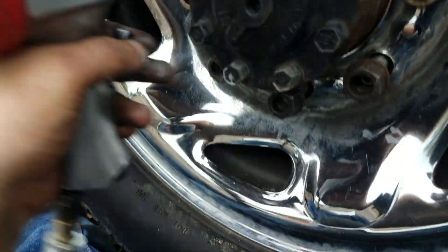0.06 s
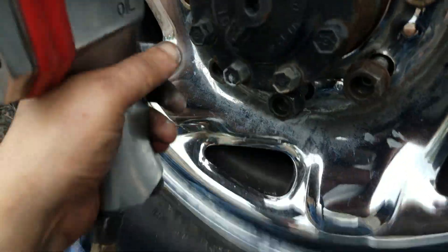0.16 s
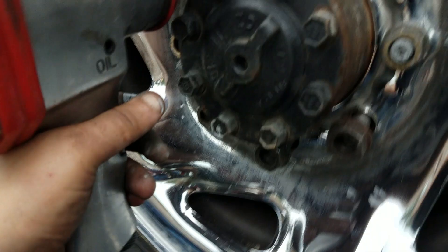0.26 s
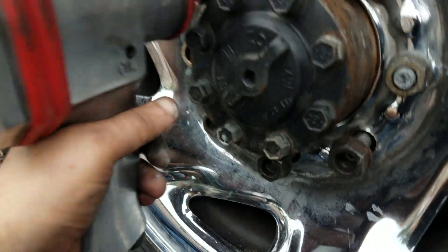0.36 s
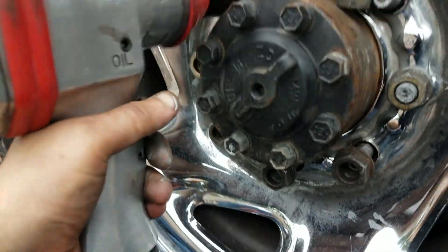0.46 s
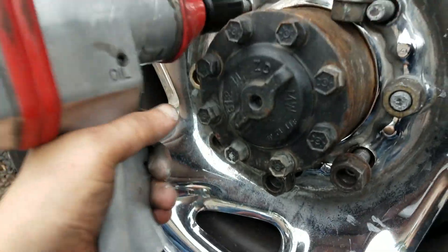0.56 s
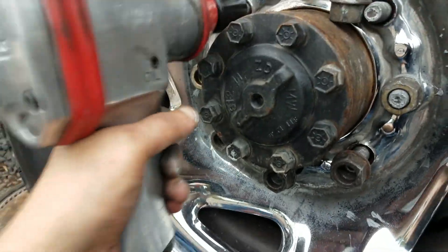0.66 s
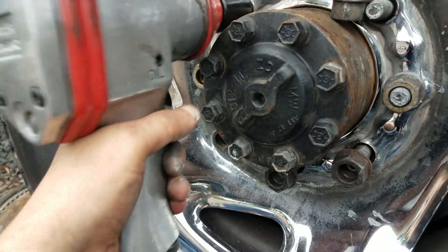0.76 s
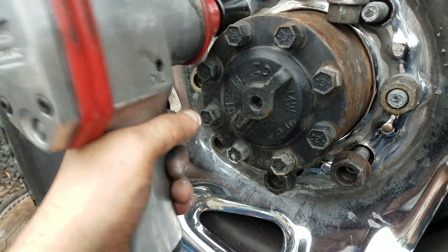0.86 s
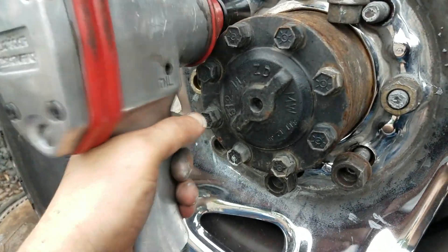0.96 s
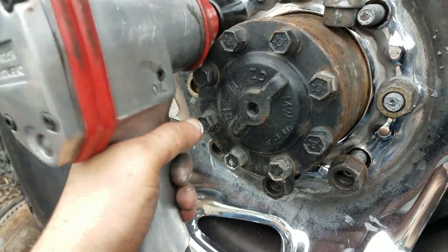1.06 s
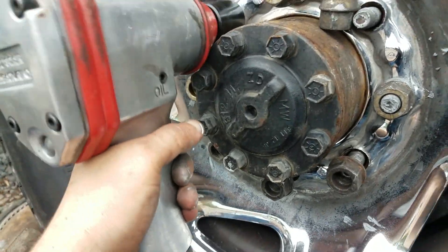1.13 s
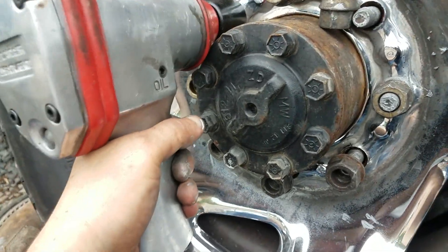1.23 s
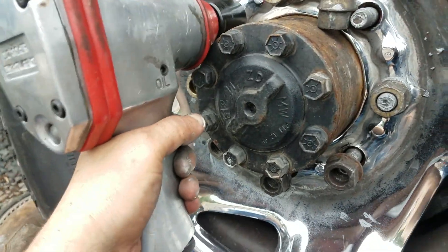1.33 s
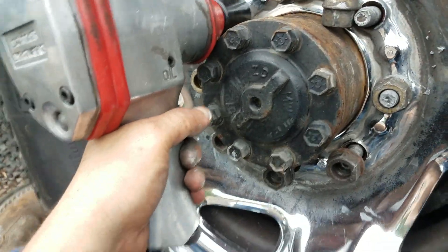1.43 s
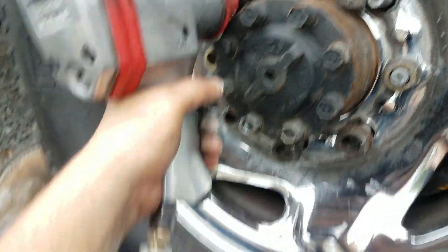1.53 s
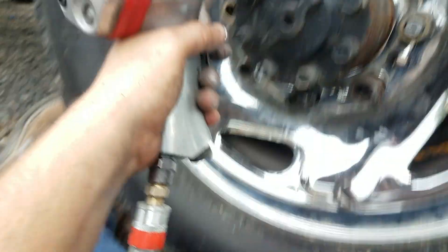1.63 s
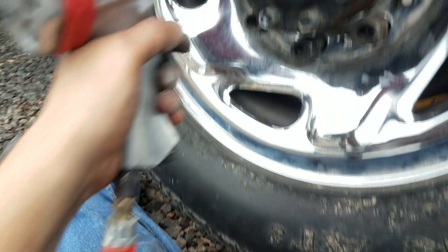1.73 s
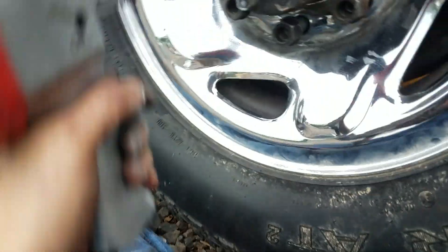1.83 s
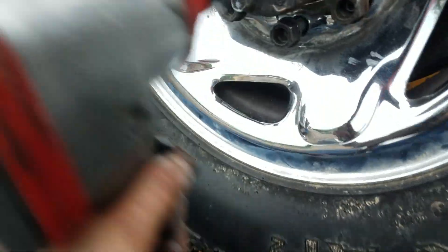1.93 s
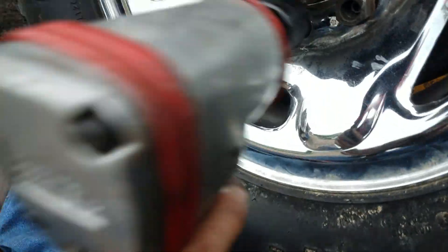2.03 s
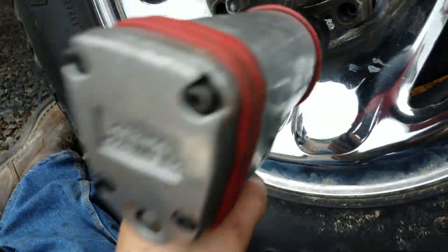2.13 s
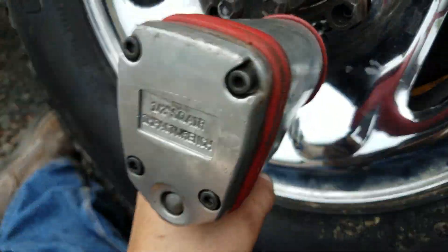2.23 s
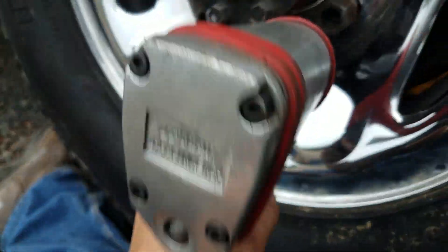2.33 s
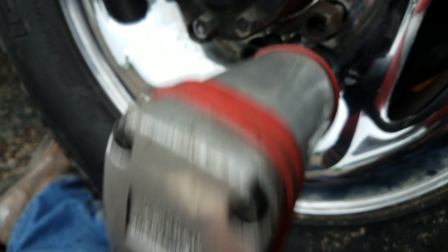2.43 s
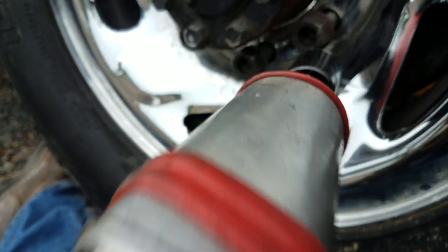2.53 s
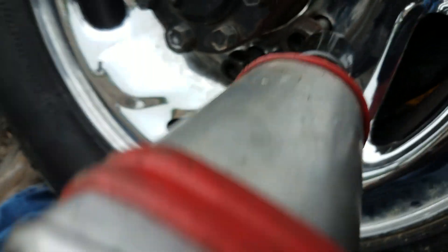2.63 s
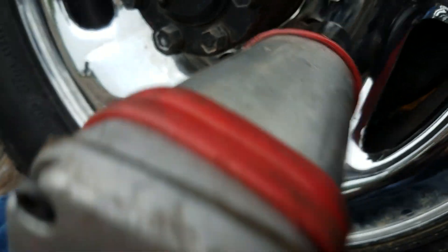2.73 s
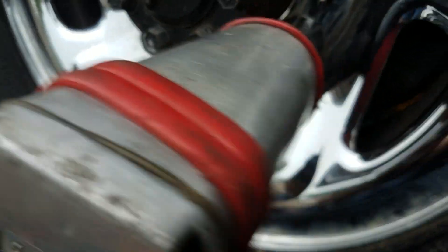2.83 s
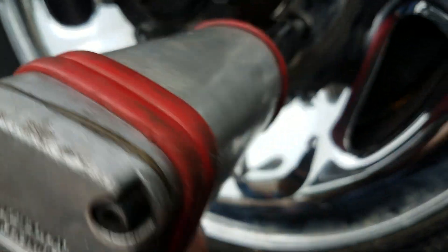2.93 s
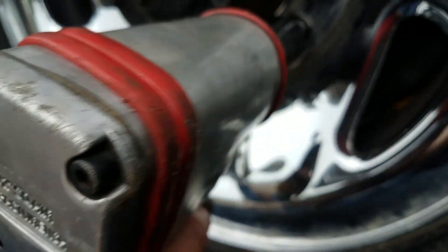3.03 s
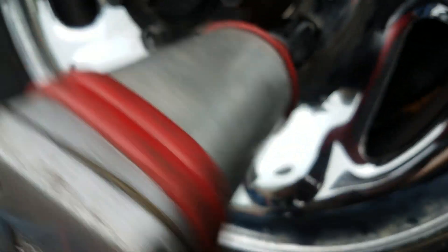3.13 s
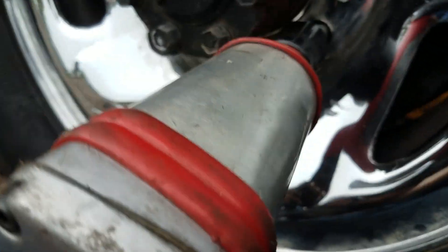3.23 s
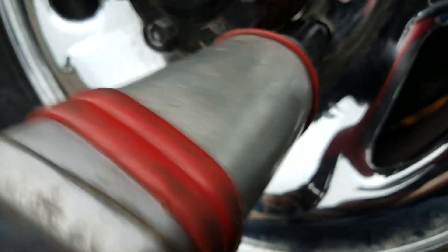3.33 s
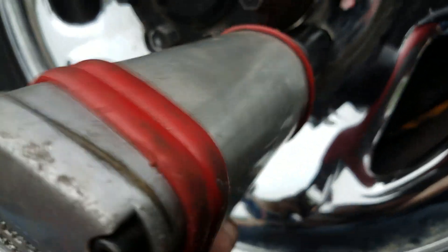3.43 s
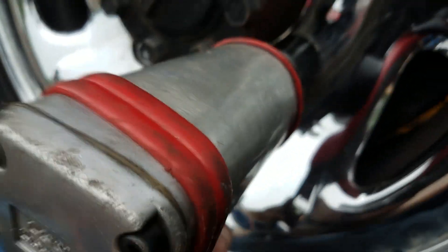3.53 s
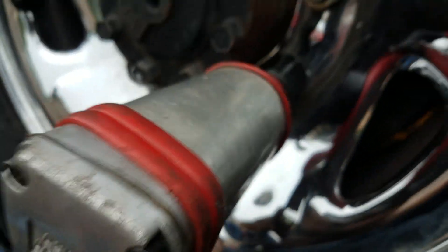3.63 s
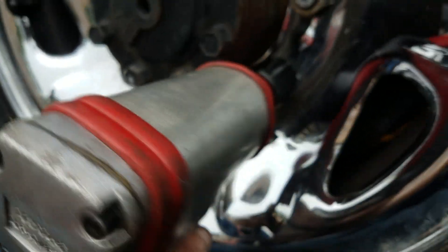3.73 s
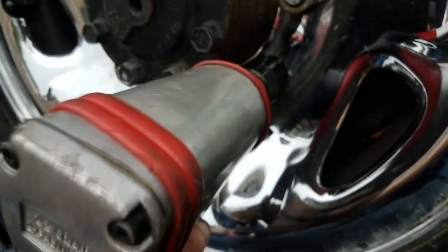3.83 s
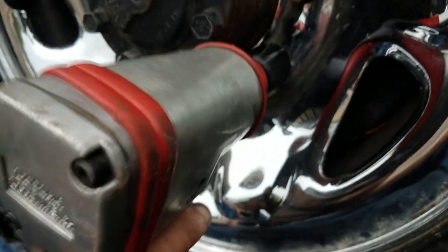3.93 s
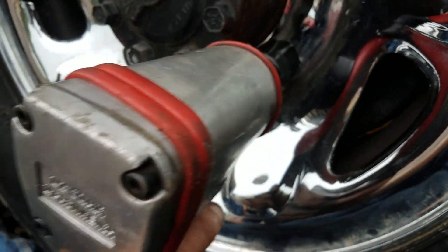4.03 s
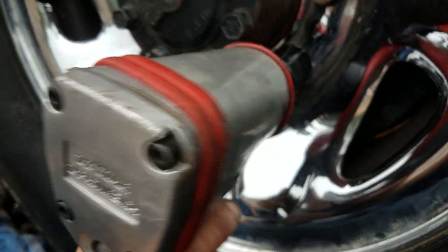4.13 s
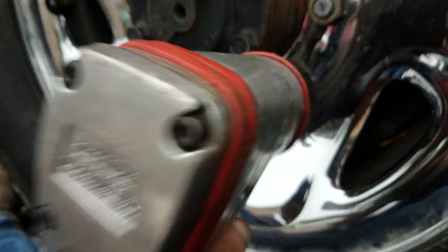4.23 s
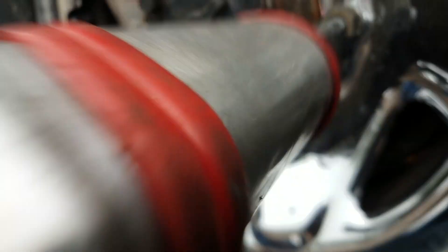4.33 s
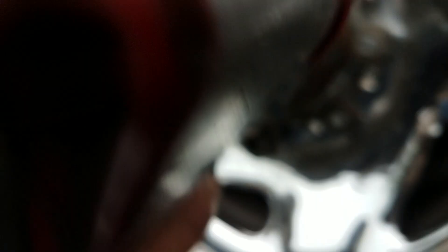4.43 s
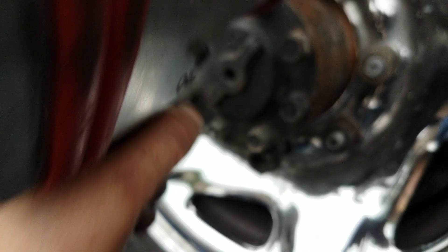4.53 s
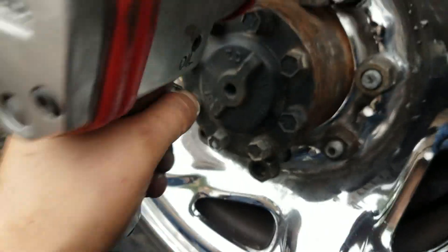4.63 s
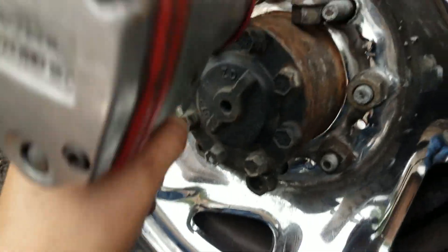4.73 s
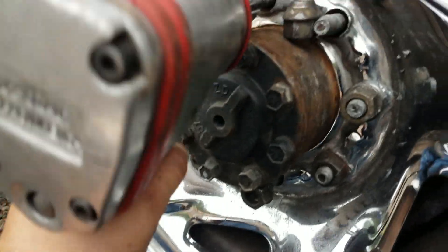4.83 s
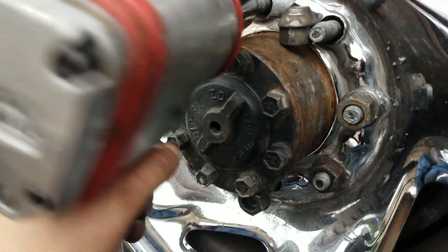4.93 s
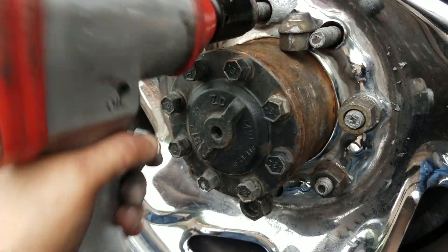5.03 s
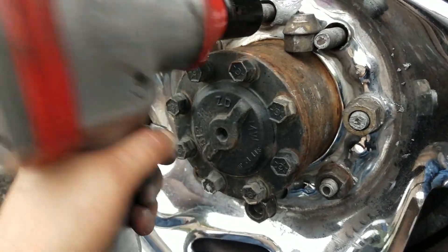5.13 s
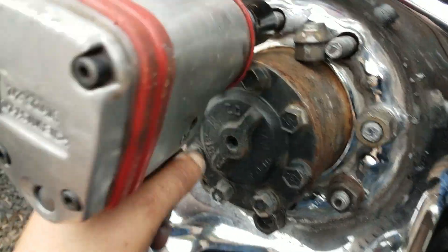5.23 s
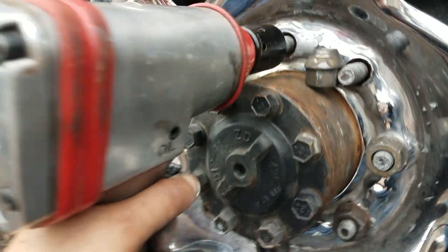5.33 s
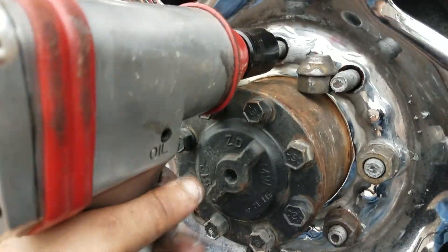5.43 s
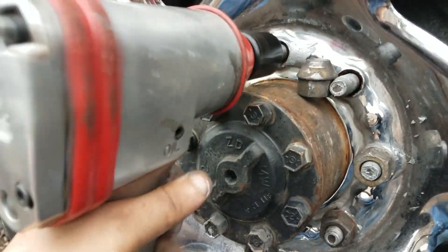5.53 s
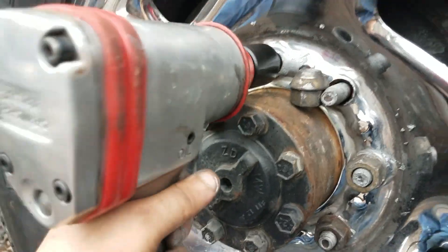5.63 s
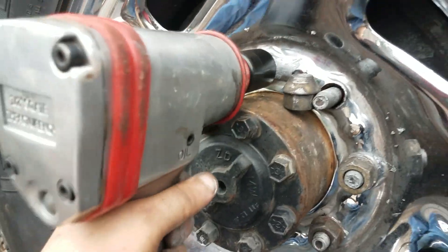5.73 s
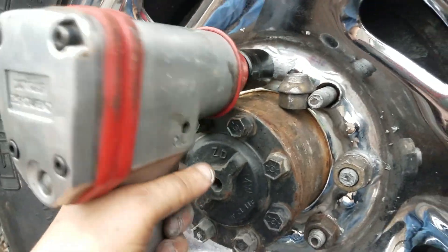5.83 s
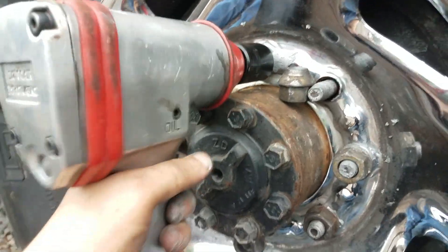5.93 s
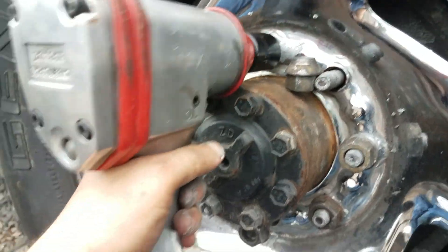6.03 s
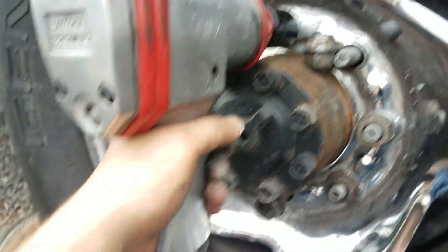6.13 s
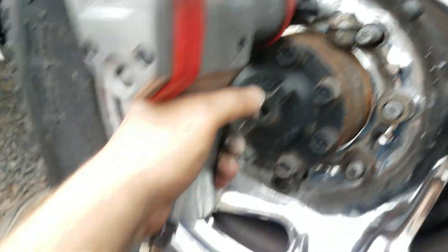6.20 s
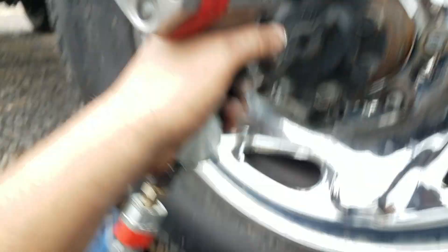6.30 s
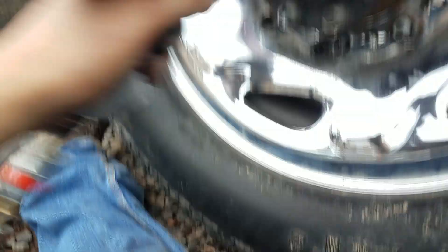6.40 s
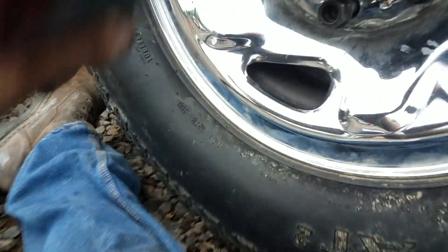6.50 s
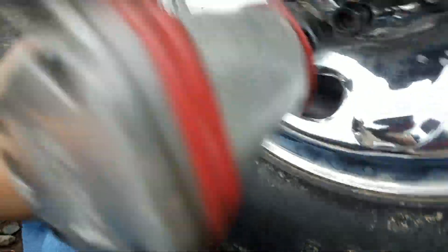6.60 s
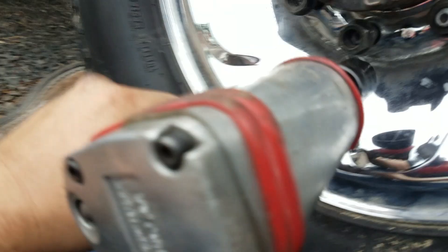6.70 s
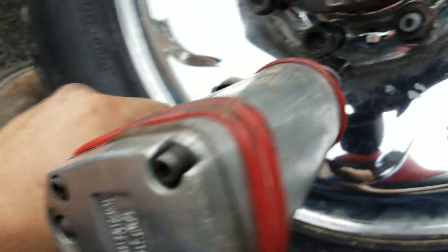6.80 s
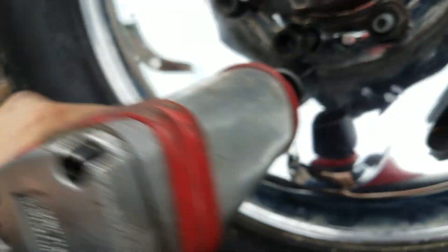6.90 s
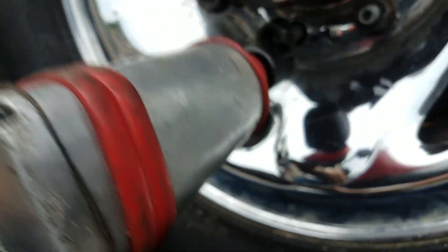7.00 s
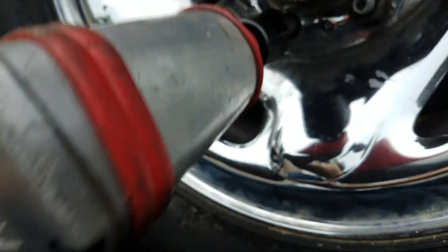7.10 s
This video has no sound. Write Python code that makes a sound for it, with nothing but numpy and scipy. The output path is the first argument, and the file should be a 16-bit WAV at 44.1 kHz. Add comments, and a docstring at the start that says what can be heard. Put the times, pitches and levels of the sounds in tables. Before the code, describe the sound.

Three bursts from an air impact wrench, recorded close on a small stereo microphone in a yard: throbbing air, a motor whine winding up, hard rapid blows ringing in steel, slightly clipped and stronger to the right in the treble. Between them are handling rumble, socket knocks, rattles and high metallic pings; a distant drone swells at the end.

```python
"""A truck wheel heard close up on a small stereo microphone: the socket clacks on nuts and studs over a yard's hum.
A pneumatic impact wrench then makes the first of three bursts: its vane motor pulses the exhaust air and
winds up in pitch, while hammer blows are short noise cracks over ringing steel. After each burst come
bouncing clacks and thin rings, with one dry snap before the third. At the end a distant drone and hiss,
made of coloured noise, swell in behind the last clacks."""
import sys
import numpy as np
from scipy import signal
from scipy.fft import rfft, irfft, next_fast_len
from scipy.io import wavfile
from scipy.ndimage import uniform_filter1d, map_coordinates

SR = 44100
rng = np.random.default_rng(int(sys.argv[2]) if len(sys.argv) > 2 else 0)


def generate_wav(signal):
    """Clip the signal to [-1, 1] and save it as 16-bit WAV at the path in sys.argv[1]."""
    frames = np.transpose(np.atleast_2d(signal))
    scaled = np.clip(frames, -1, 1) * 32767
    pcm = np.round(scaled).astype(np.int16)
    wavfile.write(sys.argv[1], SR, pcm)


N = 315756  # samples

# noise colour of struck steel: f/Hz, relative density/dB per Hz
STEEL_COLOUR = [(50, -27.5), (150, -7.5), (2100, -6), (6800, -19), (15000, -18.5)]
# modes of anvil, socket and nut: nominal f/Hz, relative level/dB, t60/s
ANVIL_MODES = [(698, -1.5, 0.032), (1520, -1.5, 0.0068), (2002, 1, 0.028), (2715, 1, 0.034),
               (3530, -7, 0.046), (8110, -11, 0.047)]
# modes of the tool housing: nominal f/Hz, relative level/dB, t60/s
HOUSING_MODES = [(203, 0.5, 0.047), (310, 2.5, 0.022), (704, 8, 0.0089)]


def amp(db):
    """Decibels to gain."""
    return 10 ** (np.asarray(db) / 20)


def unit(x):
    """Scaled to rms 1."""
    return x / np.sqrt(np.mean(x ** 2) + 1e-20)


def along(points, hz):
    """(Hz, value) points read on a log frequency axis."""
    f, v = np.transpose(points)
    return np.interp(np.log(hz + 1), np.log(f + 1), v)


def wobble(rate):
    """A smooth random curve, rate knots a second."""
    coarse = np.arange(0, N, 20)
    knots = rng.standard_normal(int(N * rate / SR) + 4)
    return np.interp(np.arange(N), coarse, map_coordinates(knots, [coarse * rate / SR]))


def filtered(x, response):
    """x times a response of frequency."""
    m = next_fast_len(N + SR // 2)
    return irfft(rfft(x, m) * response(np.fft.rfftfreq(m, 1 / SR)), m)[..., :N]


def rush(spectrum):
    """Coloured stereo noise of rms 1, its left-right likeness depending on frequency."""
    # likeness of the two channels: f/Hz, correlation
    likeness = [(30, .1), (400, .8), (1200, .3)]

    def mid_side_gains(hz):
        angle = np.arccos(np.clip(along(likeness, hz), -1, 1)) / 2
        return amp(along(spectrum, hz)) * [np.cos(angle), np.sin(angle)]

    mid, side = filtered(rng.standard_normal((2, N)), mid_side_gains)
    return unit(np.array([mid + side, mid - side]))


def patchy(x, depth_db):
    """x at rms 1, with patches of random gain over time and frequency."""
    z = signal.stft(x, nperseg=512)[2]
    field = rng.standard_normal(z.shape[1:])
    field = uniform_filter1d(uniform_filter1d(field, size=6, axis=0), size=6, axis=1)
    return unit(signal.istft(z * amp(depth_db * unit(field)), nperseg=512)[1][:, :N])


def moving_band(centre_hz, width):
    """Noise of steady level in a band whose centre glides; width as a share of the centre."""
    hz, t, z = signal.stft(rng.standard_normal((2, N)), SR, nperseg=512)
    centre, share = [np.interp(t, np.arange(N) / SR, c) for c in (centre_hz, width)]
    band = 1 / (1 + ((hz[:, None] / centre - 1) / share) ** 2)
    return unit(signal.istft(z * band / np.linalg.norm(band, axis=0), SR, nperseg=512)[1][:, :N])


def dying(hits, rise):
    """Envelope of (s, dB, s to -60 dB) hits: a short rise, then a fall lasting 5 to 500 ms."""
    env = np.zeros(N + SR)
    for s, db, t60 in hits:
        t = np.arange(round(np.clip(t60, .005, .5) * SR)) / SR
        env[round(s * SR):][:len(t)] += amp(db - 60 * t / t[-1]) * (1 - np.exp(-t / rise))
    return env[:N]


def ringing(hits, modes, scatter_db, detune=0, spread=1):
    """(s, dB) hits ring decaying modes, with random strengths, pitches and phases (spread in radians)."""
    out = np.zeros((2, N + SR))
    for s, db in hits:
        for (hz, level, t60), (size, pitch, *phase) in zip(modes, rng.standard_normal((len(modes), 4))):
            t = np.arange(round(min(t60, 1) * SR)) / SR
            phases = spread * np.array(phase)[:, None]  # one per channel
            swing = np.sin(2 * np.pi * hz * (1 + detune * pitch) * t + phases)
            decay = amp(db + level + scatter_db * size - 60 * t / t60)
            out[:, round(s * SR):][:, :len(t)] += decay * (1 - np.exp(-2 * hz * t)) * swing
    return out[:, :N]


def spans(rows):
    """For each sample the latest (start s, end s, ..) row: time since start, past end, length, other columns."""
    t, rows = np.arange(N) / SR, np.asarray(rows)
    start, end, *cols = rows[np.clip(np.searchsorted(rows[:, 0], t) - 1, 0, None)].T
    return np.clip(t - start, 0, None), np.clip(t - end, 0, None), end - start, cols


def far_drones():
    """A steady far machine, and a distant drone and hiss swelling in at the end, all as coloured noise."""
    # far machine: f/Hz, relative density/dB per Hz
    machine_colour = [(150, -29), (200, 0.5), (215, -11.5), (300, -39)]
    # late drone and hiss: f/Hz, relative density/dB per Hz
    groan_colour = [(200, -28.5), (335, 2.5), (410, -2), (700, -6.5), (1000, -31.5), (8000, -23.5),
                    (15900, -28)]
    start_s, rise_s = 6.446, 0.3
    swell = 1 - np.exp(-np.clip(np.arange(N) / SR - start_s, 0, None) / rise_s)
    return amp(-56) * swell * rush(groan_colour) + amp(-69) * rush(machine_colour)


def yard():
    """A low rumble and a grainy rustle that swell while the tool is moved about, over far drones."""
    # surroundings: t/s, rumble level/dB, rustle level/dB, before the wobble
    surroundings = [(0, -26, -39), (.2, -42.5, -58.5), (1.652, -50.5, -70.5), (2.149, -69, -72),
                    (2.4, -51, -56.5), (2.849, -45.5, -53), (3.25, -37, -44), (4.58, -62.5, -73),
                    (4.998, -65.5, -66.5), (5.2, -50.5, -54), (6.3, -55, -50.5), (6.501, -68.5, -70.5),
                    (7.16, -71, -57)]
    # rumble: f/Hz, relative density/dB per Hz
    rumble_colour = [(40, -4), (130, 3.5), (400, -8), (1300, -31.5)]
    # rustle: f/Hz, relative density/dB per Hz
    rustle_colour = [(500, -15.5), (1000, -9.5), (2600, -8), (5000, -22.5), (6600, -16), (9500, -31.5)]
    s, *levels = np.transpose(surroundings)
    rumble_db, rustle_db = [np.interp(np.arange(N) / SR, s, c) for c in levels]
    rumble = amp(rumble_db + 2.3 * wobble(24)) * rush(rumble_colour)
    rustle = amp(rustle_db + 2.8 * wobble(79)) * rush(rustle_colour)
    return rumble + rustle + far_drones()


def thin_tones():
    """Thin decaying tones left ringing in wheel and socket after a contact."""
    # tones: t/s, f/Hz, level/dB before scatter, t60/s
    tones = [(.001, 3560, -36, .15), (.12, 1270, -50, .6), (1.55, 802, -42, .5), (1.636, 3630, -39, .15),
             (4.685, 1174, -40, .09), (6.18, 3680, -36, .08), (6.28, 1174, -38, .09)]
    return sum(ringing([(s, db)], [(hz, 0, t60)], scatter_db=6) for s, hz, db, t60 in tones)


def free_socket():
    """The free socket, struck, sings on two close modes that beat together."""
    # strikes: t/s, relative level/dB
    socket_strikes = [(.001, -51), (1.635, -44.5), (2.45, -47.5), (4.23, -44.5), (6.275, -56),
                      (6.89, -51.5)]
    # socket modes: f/Hz, relative level/dB, t60/s
    socket_modes = [(11400, -6.5, 0.54), (11610, -5, 0.51)]
    return ringing(socket_strikes, socket_modes, scatter_db=2)


def housing_thuds():
    """Knocks on the tool housing ring its short low modes."""
    # knocks: t/s, relative level/dB
    knocks = [(.003, -22), (2.79, -17.5), (2.995, -10.5), (3.303, -11.5), (4.42, -8.5)]
    return ringing(knocks, HOUSING_MODES, scatter_db=-1.5, detune=0.047, spread=0.7)


def snap():
    """One dry snap close to the microphone ports: a single up-down swing of pressure around its centre."""
    centre_s, width_s = 4.4201, .0001
    u = (np.arange(N) / SR - centre_s) / width_s
    return -2 * amp(-2) * u * np.exp(-u * u / 2)


def clacks():
    """Socket contacts and small ticks strike, bounce and ring the steel, with a faint rattle after."""
    # socket bumping nuts and studs: t/s, relative level/dB, nominal chatter length/s
    bumps = [(0.05, -15.5, 0.019), (0.108, -27, 0.038), (1.634, -26, 0.039), (1.739, -33, 0.029),
             (2.214, -32.5, 0.046), (2.297, -18.5, 0.044), (2.451, -30.5, 0.016), (2.597, -18, 0.026),
             (2.763, -19, 0.028), (2.787, -22, 0.057), (2.917, -13.5, 0.055), (2.992, -10, 0.03),
             (3.007, -12.5, .05), (4.348, -34.5, 0.023), (4.674, -15, 0.03), (4.762, -33, 0.051),
             (5.066, -17.5, 0.051), (5.148, -20, 0.02), (5.183, -29, 0.047), (5.299, -20, 0.027),
             (6.276, -20, 0.027), (6.388, -30.5, .03), (6.812, -34, 0.018), (7.038, -26.5, 0.017),
             (7.118, -22.5, .025), (7.136, -16.5, 0.035)]
    # grit and loose metal: t/s, relative level/dB
    ticks = [(3.041, -29.5), (3.168, -31), (4.235, -38.5), (4.378, -38.5), (4.817, -43.5), (5.03, -37),
             (6.228, -41), (6.407, -36.5)]
    # clack noise: f/Hz, relative density/dB per Hz
    clack_colour = [(300, -5), (2500, -6), (9000, -21.5)]
    gap_share, loss_db = .15, 4  # bounce gap over chatter length, before jitter; mean loss per bounce
    contacts = list(bumps) + [(s, db, .014) for s, db in ticks]
    bounces = []
    for (s, db, length), luck in zip(contacts, rng.standard_normal((len(contacts), 4, 2))):
        for k, (late, size) in enumerate(luck):
            bounce_s = s + k * gap_share * length * (1 + 0.19 * late)
            bounce_db = db - loss_db * k + 2 * size * (k > 0)
            bounces.append((bounce_s, bounce_db, length))
    chatter = dying([(s, db + 0.65, 0.36 * length) for s, db, length in bounces], rise=0.0004)
    chatter = chatter * amp(2.9 * wobble(300)) * rush(clack_colour)
    # loose metal keeps rattling faintly and dully afterwards
    rattle = dying([(s, db - 17, 4 * length) for s, db, length in contacts], rise=0.004)
    rattle = rattle * amp(3.5 * wobble(120)) * rush(STEEL_COLOUR)
    steel = ringing([(s, db - 9.5) for s, db, length in bounces], ANVIL_MODES, scatter_db=3.5, detune=.1)
    low_cut = signal.butter(2, 350, "high", fs=SR)  # small contacts carry little bass
    return signal.lfilter(*low_cut, chatter + rattle + steel)


def gliding_bands():
    """Gliding noise bands: an opening blast, the tight nut ringing near 2 kHz, a low whirr, a rising whistle."""
    # bands: start t/s, end t/s, first centre f/Hz, last centre f/Hz, width as share of centre, level/dB
    bands = [(.385, .47, 3400, 3190, 0.15, -22.5), (1.15, 1.5, 2087, 2017, 0.079, -23.5),
             (2.37, 2.46, 290, 299.5, .08, -37.5), (3.7, 4.01, 2067, 1962, 0.049, -26.5),
             (5.5, 6.13, 4076, 4826, 0.036, -29)]
    blowing, _, length, (from_hz, to_hz, width, db) = spans(bands)
    sounding = np.clip(np.minimum(blowing, length - blowing) / 0.017, 0, 1)
    centre_hz = from_hz + (to_hz - from_hz) * np.clip(blowing / length, 0, 1)
    return sounding * amp(db) * moving_band(centre_hz, width)


def hammer_blows():
    """All blows (s, dB): the single ones and the even runs, whose two strikers alternate."""
    # single blows while the nut still turns and around release: t/s, relative level/dB
    single = [(0.395, -7), (0.425, -7), (0.454, -8.5), (0.522, -7.5), (0.56, -7.5), (0.585, -8.5),
              (0.621, -7), (0.666, -8.5), (0.714, -7.5), (1.543, -5), (3.273, -10), (3.301, -5.5),
              (3.335, -5), (3.389, -5), (3.435, -10.5), (3.509, -7), (3.598, -10), (3.641, -8.5),
              (3.664, -5), (4.035, -11.5), (4.074, -7), (4.099, -12), (4.149, -5), (5.373, -11),
              (5.397, -7.5), (5.446, -6), (5.5, -7.5), (5.545, -11.5), (5.593, -8.5), (5.713, -9),
              (5.774, -9.5), (5.805, -12.5), (5.832, -8.5), (5.893, -14.5), (6.167, -6.5)]
    # even runs of blows as the nut tightens: first t/s, last t/s, level/dB before scatter, every second weaker by/dB
    even_runs = [(0.741, 0.806, -6.5, 3), (0.85, 0.981, -7, 2), (1.009, 1.097, -5, 0),
                 (1.128, 1.204, -6.5, 1), (1.237, 1.509, -6, 1.5), (3.705, 4, -5.5, 0.5),
                 (5.871, 6.121, -8.5, 4.5)]
    # number of blows in each even run, under "count"
    strokes = dict(count=(3, 5, 4, 3, 10, 11, 8))
    blows = list(single)
    for (first, last, db, weak_db), count in zip(even_runs, strokes["count"]):
        for k, s in enumerate(np.linspace(first, last, count)):
            blows.append((s, db - weak_db * (k % 2) + rng.normal(0, 1.2)))
    return blows


def strikes(blows):
    """Hammer on anvil: a noise crack, a dull wash, and ringing in the steel and the tool housing."""
    crack = dying([(s, db + 1.0, .024) for s, db in blows], rise=0.00088)
    crack = crack * amp(2.8 * wobble(350)) * rush(STEEL_COLOUR)
    # wheel and axle scatter each blow into a short dull wash
    wash = dying([(s, db - 18.5, .16) for s, db in blows], rise=0.0067) * rush(STEEL_COLOUR)
    steel = ringing([(s, db - 10.5) for s, db in blows], ANVIL_MODES, scatter_db=1.5, detune=.08)
    thump = ringing([(s, db - 22) for s, db in blows], HOUSING_MODES, scatter_db=4.0, detune=0.11)
    return crack + wash + steel + thump


def vane_motor(blows):
    """Vane-pass phase and its harmonic tone: the rotor spins up, then slows and quietens once the nut seats."""
    # each pull: start t/s, nut seats t/s, spin-up/s, free vane-pass f/Hz, tone level/dB, overtones raised by/dB
    motor_pulls = [(.39, .84, .06, 345, -22, -9), (3.285, 3.635, .055, 440, -19.5, 0),
                   (5.37, 5.775, .07, 440, -20, 0)]
    # harmonics of the vane pass: multiple, relative level/dB
    harmonics = [(1, 0), (2, 1), (3, -5), (4, -6), (5, -9)]
    turning, seated, _, (spin_s, free_hz, tone_db, over_db) = spans(motor_pulls)
    loaded_share, loaded_db, load_s, swell_s = .78, -16, .035, .09  # pitch share and level change under load
    load = 1 - np.exp(-seated / load_s)
    pitch_hz = free_hz * (1 - np.exp(-turning / spin_s)) * (1 - (1 - loaded_share) * load)
    # each blow brakes the rotor, which then spins up again
    braking = dying([(s, db, .5) for s, db in blows], rise=.002)
    pitch_hz = pitch_hz * (1 - .13 * np.clip(braking, 0, 1)) * (1 + 0.014 * wobble(60))
    turn = 2 * np.pi * np.cumsum(pitch_hz) / SR
    lag = np.array([[.7], [0]])  # radians, left and right
    tone = unit(sum(amp(db + (k > 1) * over_db + 3.3 * wobble(40)) * np.cos(k * turn - lag)
                    for k, db in harmonics))
    tone = tone * amp(tone_db + loaded_db * load) * (1 - np.exp(-(turning / swell_s) ** 2))
    return turn, tone


def exhaust(turn, tone):
    """The trigger valve lets through the vane tone, hissing air that throbs with it, and a low buffet."""
    # pulls: t/s, release t/s, valve opening/s, hiss level/dB, hiss sag/dB per s, first sizzle level/dB, buffet/dB
    pulls = [(.387, 1.515, 0.0027, -17.5, 1.5, -25, -24), (3.267, 4.11, 0.0015, -17.5, 6.5, -18, -25),
             (5.355, 6.125, 0.022, -17, 11, -19, -58)]
    # hiss: f/Hz, relative density/dB per Hz
    hiss_colour = [(200, -24), (400, -10.5), (1000, -15.5), (2700, -10.5), (5400, -14.5), (6900, -22),
                   (8200, -14.5), (9600, -22.5)]
    # treble sizzle: f/Hz, relative density/dB per Hz
    sizzle_colour = [(9500, -19), (11500, 2), (15900, -7)]
    # low buffet: f/Hz, relative density/dB per Hz
    buffet_colour = [(25, -26), (65, -2), (300, -4.5), (700, -28.5)]
    since, past, _, (open_s, hiss_db, sag, sizzle_db, buffet_db) = spans(pulls)
    # the air dies fast once the valve shuts, at 500 dB per s
    valve = (1 - np.exp(-(since / open_s) ** 2)) * amp(-500 * past)
    hiss = amp(hiss_db - sag * since) * patchy(rush(hiss_colour), depth_db=2.0)
    sizzle = amp(sizzle_db - 16 * since) * rush(sizzle_colour)  # fades 16 dB per s
    # the exhaust opens once per vane, so the air throbs at the motor pitch
    air = (hiss + sizzle) * amp(1.5 * wobble(25)) * (1 + 0.2 * np.cos(turn))
    buffet = amp(buffet_db + 3.9 * np.array([wobble(14), wobble(20)])) * rush(buffet_colour)
    return valve * (air + buffet + tone)


def wrench():
    """The same blows strike the anvil and brake the vane motor, whose turning pulses the exhaust."""
    blows = hammer_blows()
    turn, tone = vane_motor(blows)
    return exhaust(turn, tone) + strikes(blows)


def scene():
    """All sources together, from the yard behind to the wrench in front."""
    contacts = clacks() + thin_tones() + snap() + housing_thuds() + free_socket()
    return yard() + contacts + gliding_bands() + wrench()


def record(dry):
    """Two ports a few centimetres apart, the tool nearer the right; low cut, soft clipping, band limit."""
    # level between the ports: f/Hz, left minus right/dB
    left_over_right = [(60, -1), (300, 0.5), (2500, -5), (10000, -0.85)]
    side = np.array([[.5], [-.5]])

    def port_response(hz):
        low_cut = hz / np.hypot(hz, 40)
        delay = np.exp(-2j * np.pi * hz * side * 1.5e-4)  # left later than right by 0.15 ms
        return amp(side * along(left_over_right, hz)) * low_cut * delay

    ports = filtered(dry, port_response)
    clipped = ports / (1 + np.abs(ports / .95) ** 6) ** (1 / 6)
    return filtered(clipped, lambda hz: hz < 15900)


dry = scene()
out = record(dry)
generate_wav(out)
```